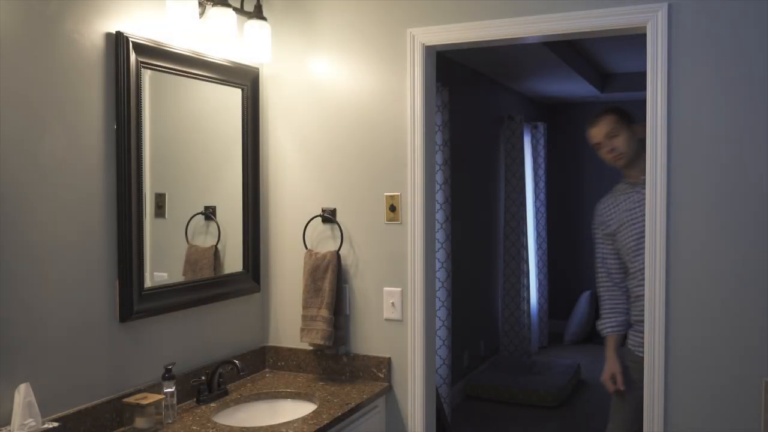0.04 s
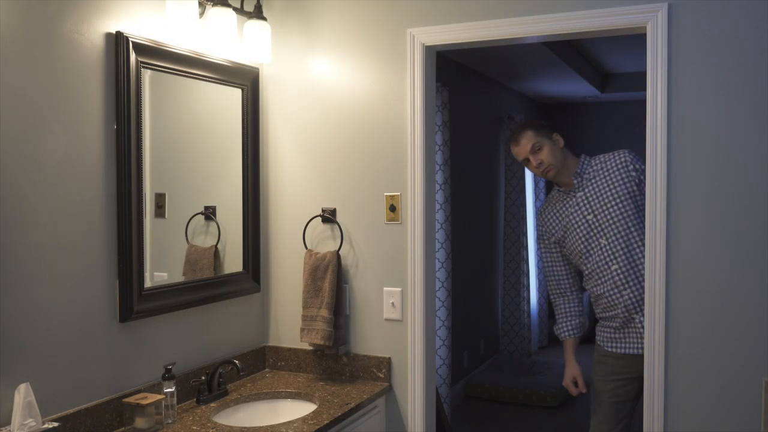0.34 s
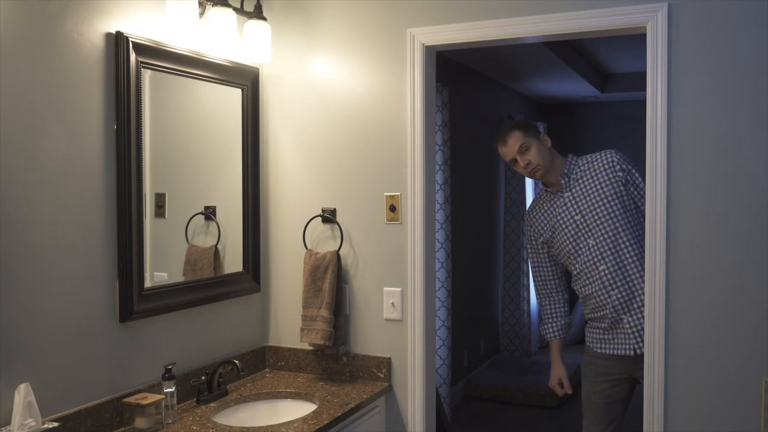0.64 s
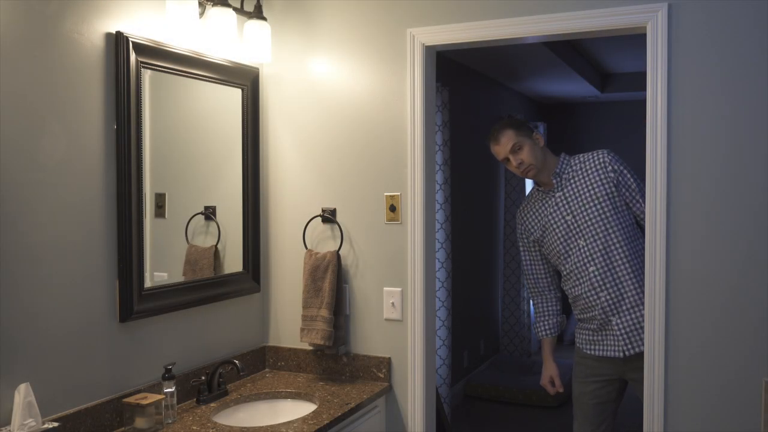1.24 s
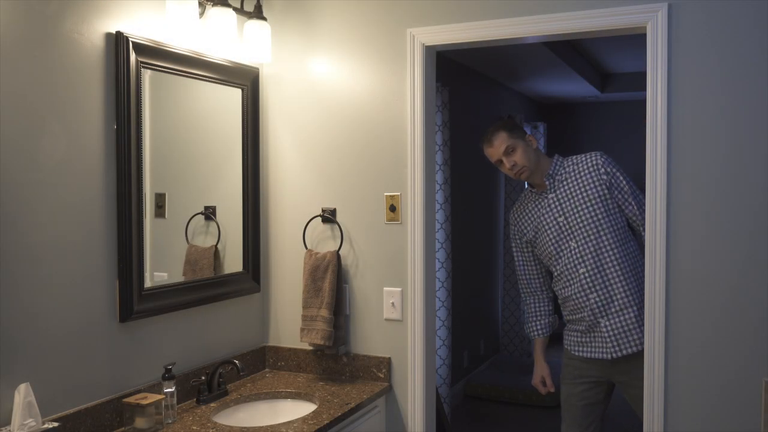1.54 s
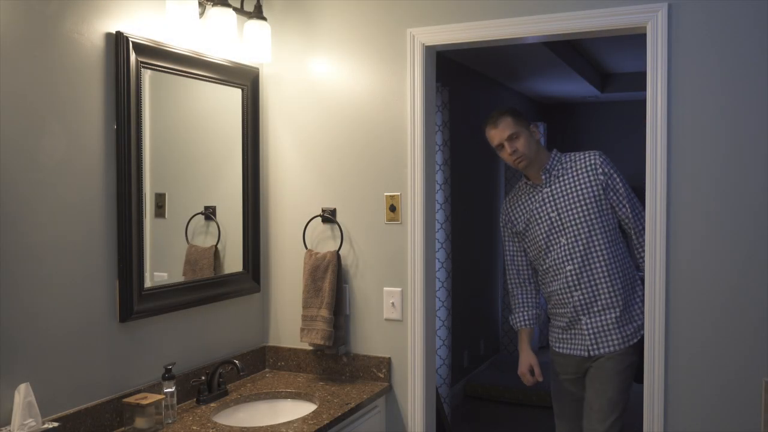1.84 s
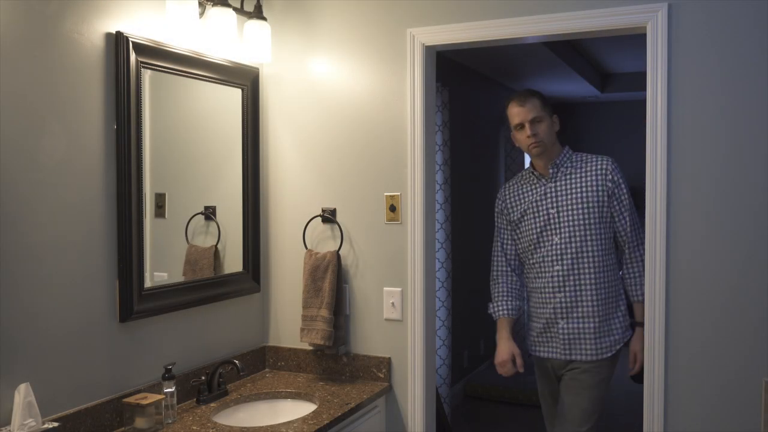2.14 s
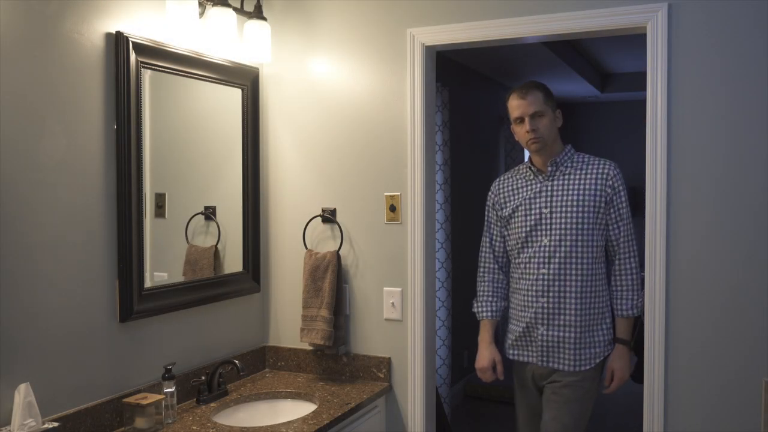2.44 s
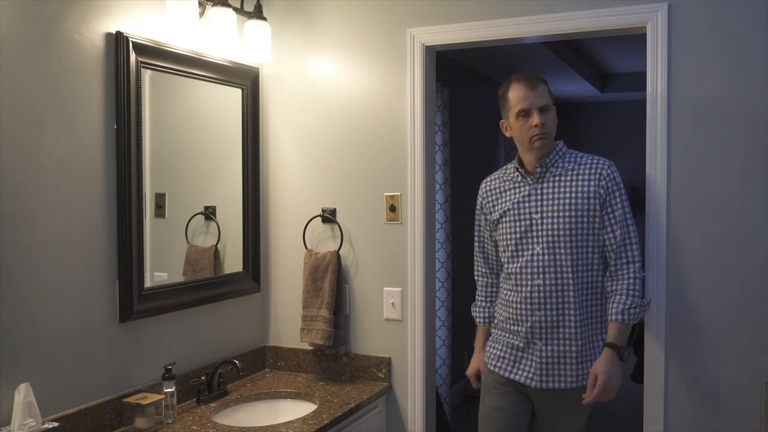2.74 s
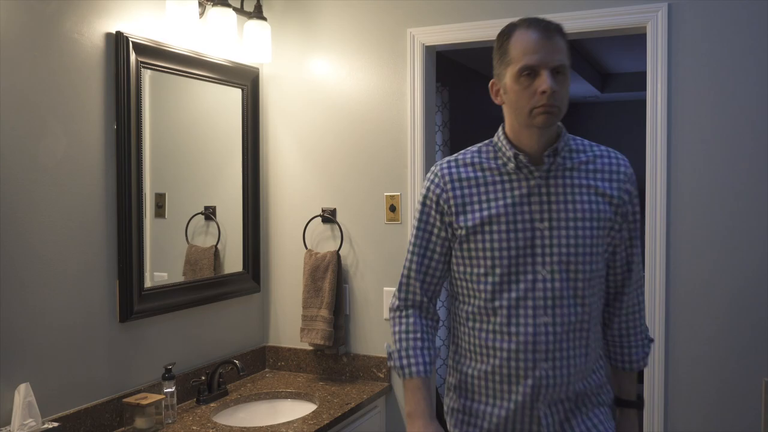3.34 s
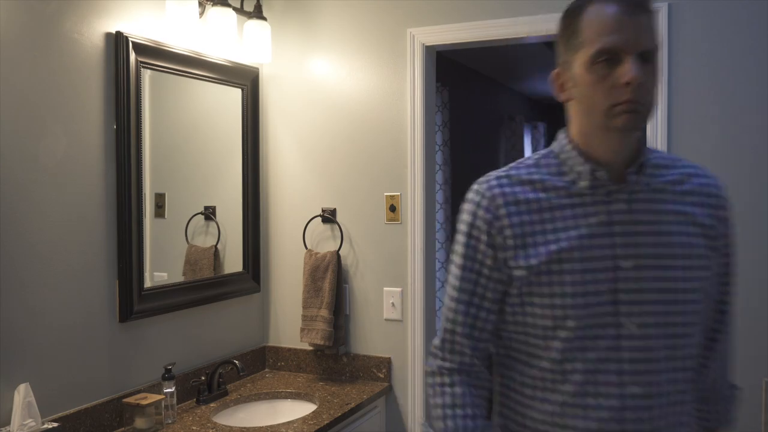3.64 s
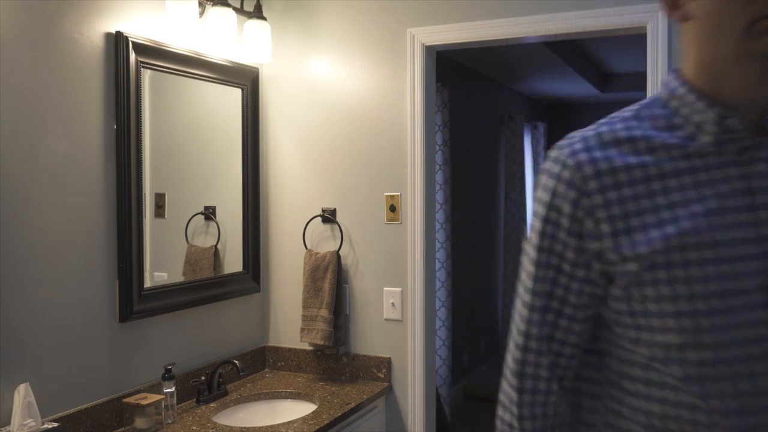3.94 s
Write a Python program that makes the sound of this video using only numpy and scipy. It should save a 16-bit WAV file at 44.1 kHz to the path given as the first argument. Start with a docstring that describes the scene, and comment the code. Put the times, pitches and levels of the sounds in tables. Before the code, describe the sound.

Water hisses steadily through a leaking toilet valve as a few footsteps approach.

```python
"""A bathroom, the microphone close to a leaking toilet valve. Water hisses through it: the jet
sputters and spits, valve and pipe ring in narrow bands, and small bubbles gurgle in the tank.
About halfway through, someone walks in: clothes rustle, soles scuff, and footsteps boom in the
floor and the room. The near water is dry; the walker carries the echo of the hard walls."""
import sys
import numpy as np
from scipy import signal
from scipy.fft import rfft, irfft
from scipy.io import wavfile

SR = 44100
rng = np.random.default_rng(int(sys.argv[2]) if len(sys.argv) > 2 else 0)


def master_out(mix):
    """Clip the mix to full scale and print it as 16-bit PCM to the path in sys.argv[1]."""
    frames = np.transpose(np.atleast_2d(mix))
    ceiling = np.clip(frames, -1, 1)
    pcm = np.round(ceiling * 32767).astype(np.int16)
    wavfile.write(sys.argv[1], SR, pcm)


N = 176400
T, HZ = np.arange(N) / SR, np.fft.rfftfreq(N, 1 / SR)

# resonances of valve and pipe: f/Hz, width/Hz, level/dB, swing with the jet/dB, own swing/dB
VALVE_MODES = [(3380, 124, -62.5, -1.2, 3.5), (4435, 210, -52.5, 1.0, 3), (5980, 320, -53.5, -0.5, 4),
               (6524, 300, -55.5, 0.5, 3.5), (9704, 230, -47.5, 2.6, 3), (10200, 650, -50, -1, 2.5),
               (11410, 430, -43.5, 3.2, 2.16), (12120, 360, -47, 2.5, 1.5), (12530, 430, -46.5, 3, 1.8),
               (13550, 450, -52, 9, -1), (14650, 560, -49.5, -1, 2), (15680, 300, -55, 7, -1)]
# stereo width of the water: f/Hz, side over mid/dB
WATER_WIDTH = [(130, -26), (1300, -25), (3400, -58), (4450, -7), (6000, -34), (8000, -57), (10500, -41),
               (11500, -18.5), (12600, -21), (13600, 0.5), (14500, -8), (15700, -16)]
# footfalls: t/s, level/dB, rise/s, hold/s, decay/s, dull above/Hz, ring of the floor/dB
FOOTFALLS = [(2.18, -46.5, .03, 0.065, 0.055, 55, -14), (2.609, -46.5, 0.016, .02, 0.16, 900, -12),
             (3.071, -30, 0.016, 0.021, 0.049, 850, 0), (3.245, -40.5, 0.0089, .01, 0.037, 600, -8.5),
             (3.674, -38.5, 0.018, .07, 0.11, 148, -7)]


def amp(db):
    """Decibels to gain."""
    return 10 ** (np.asarray(db) / 20)


def unit(x):
    """Scales to rms 1."""
    return x / np.sqrt(np.mean(x ** 2) + 1e-20)


def curve(points, hz=HZ):
    """Interpolates a table on a log-frequency axis."""
    f, value = np.transpose(points)
    return np.interp(np.log(hz + 1), np.log(f + 1), value)


def noise(gain):
    """Noise of rms 1 with the given spectrum."""
    return unit(irfft(rfft(rng.standard_normal(N)) * gain, N))


def stereo_noise(gain, side_db):
    """Left and right noise of rms 1, from a mid and a side signal."""
    mid, side = rfft(rng.standard_normal((2, N))) * gain
    side = side * amp(side_db)
    return unit(irfft(np.array([mid + side, mid - side]), N))


def band(hz, width_hz):
    """Spectrum of a resonance with broad, slowly falling skirts."""
    return 1 / (1 + ((HZ - hz) / (0.61 * width_hz)) ** 2)


def flutter(top_hz):
    """Random motion of rms 1 up to about top_hz, with no slow drift."""
    return noise(HZ / (HZ + 2) / (1 + (HZ / top_hz) ** 2))


def stroke(start, rise, decay, hold=0):
    """An envelope that rises, holds, then dies away."""
    t = np.maximum(T - start, 0)
    return np.sqrt(np.minimum(t / rise, 1)) * np.exp(-np.clip((t - rise - hold) / decay, 0, 50))


def swell(centre, half_length):
    """A bell-shaped rise and fall around a moment."""
    return np.exp(-np.minimum(((T - centre) / half_length) ** 2, 50))


def muffle(hz, dull_hz):
    """Low-pass gain: a soft sole takes the treble out of a footfall."""
    return 1 / np.hypot(1, (hz / dull_hz) ** 1.56)


def jet():
    """Close up, the sputtering jet drives a broad spray and the resonances of the valve."""
    # spectrum of the spray: f/Hz, level/dB
    spray = [(700, -32), (2900, -21.5), (3600, -15), (5400, -15), (6200, -9), (7200, -8.5), (9200, -6.5),
             (10800, -21.5), (12500, -5.5), (14200, -4.5), (15800, -5.5)]
    # drift of the top of the hiss: t/s, level near 10 kHz/dB, level near 12 kHz/dB
    treble_drift = [(0, -1, -6), (.14, 5, 0), (.35, 1, -3), (.6, 0, 1.5), (1.1, 0, 2), (1.4, -1, 2),
                    (1.9, .5, 0), (2.2, 1, 1), (2.37, -1, -3.5), (2.55, -1, 0), (3.3, 0, 0.5), (4, 0, 1.5)]
    times, near_10k_db, near_12k_db = np.transpose(treble_drift)
    sputter = noise(band(hz=25.2, width_hz=9.9))
    flow = unit(0.29 * sputter + 0.71 * flutter(top_hz=110))
    flow = unit(np.tanh(flow / 1.7))  # rounds off the extremes
    side_db = curve(WATER_WIDTH)
    out = amp(-40.5) * unit(stereo_noise(amp(curve(spray)), side_db) * amp(2.5 * flow))
    for hz, width, db, with_jet_db, own_db in VALVE_MODES:
        drift_db = near_10k_db * (9000 < hz < 11000) + near_12k_db * (11000 < hz < 13000)
        ring = stereo_noise(band(hz, width), side_db)
        flicker = amp(with_jet_db * flow + own_db * flutter(top_hz=45.2))
        out += amp(db + np.interp(T, times, drift_db)) * unit(ring * flicker)
    return out


def spits():
    """Air pockets burst in the valve: a fine crackle and some longer spits."""
    # two spectra of a spit: f/Hz, level of the usual one/dB, level of the lower one/dB
    colours = [(2500, -37, -36), (4400, -16, -24), (6200, -13.5, -21), (9100, -10.5, -12), (9700, -9, 6),
               (10700, -7.5, -3), (11430, 4.5, -1), (12550, 2, 0), (13300, -7, -1), (15700, -5, -0.5)]
    # strongest spits: t/s, level/dB, half-length/s, power share of the lower spectrum (0-1)
    bursts = [(0.145, -25.5, 0.0053, 0.9), (0.442, -30, .003, .1), (0.569, -31, .005, .2),
              (.616, -26, .0025, .1), (0.621, -28, .003, .1), (0.914, -31, .007, .5),
              (1.085, -28, .003, .3), (1.273, -25.5, 0.0015, .1), (1.552, -30.5, 0.0076, 0.1),
              (1.646, -30, 0.0054, .1), (1.682, -29, 0.0045, .1), (1.785, -30.5, .005, .2),
              (1.933, -28, .005, .1), (1.969, -27, 0.0031, .2), (2.180, -26, 0.0021, .1),
              (2.488, -31, 0.0059, .1), (2.59, -27, 0.0036, .3), (2.694, -28.5, 0.0041, .1),
              (2.831, -30.5, .005, .1), (3.044, -25.5, 0.0029, .1), (3.196, -28.5, 0.0054, .3),
              (3.3, -34, 0.0024, .3), (3.823, -28.5, .005, .2), (3.9, -22.5, .0045, 0.9)]
    spectra = [amp(curve(np.array(colours)[:, [0, k]])) for k in (1, 2)]
    usual, lower = (stereo_noise(gain, curve(WATER_WIDTH)) for gain in spectra)
    pops_per_s, pop_decay_s = 290, 0.0013
    pops = rng.random(N) < pops_per_s / SR
    strength = amp(5 * np.minimum(rng.exponential(1, N), 2))  # spread over 10 dB
    crackle = unit(signal.lfilter([1], [1, -np.exp(-1 / (pop_decay_s * SR))], pops * strength))
    out = amp(-45) * crackle * usual
    grain = unit(amp(0.99 * flutter(top_hz=500)))
    for t, db, half_length, share in bursts:
        hiss = np.sqrt(1 - share) * usual + np.sqrt(share) * lower
        out += amp(db) * grain * swell(t, half_length) * hiss
    return out


def tank():
    """Bubbles ring briefly in the tank over a steady gurgle and the drone of the supply pipe."""
    # spectrum of the gurgle: f/Hz, level/dB
    gurgle = [(500, -26), (900, -16), (1100, -10), (1200, -2.5), (1280, 2), (1360, -5.5), (1480, -18.5),
              (1800, -30)]
    # single bubbles: t/s, peak level/dB
    bubbles = [(0.6141, -36.5), (0.6618, -26), (0.7174, -33.5), (0.8692, -38), (0.9608, -37), (2.7302, -33),
               (3.199, -29.5), (3.597, -32)]
    # spectrum of the pipe's drone: f/Hz, level/dB
    drone = [(50, -19), (92, -12), (108, -1.5), (135, -1), (158, -5.5), (180, -20), (245, -13), (290, -25),
             (500, -35)]
    bubble_hz = 1223
    out = amp(-51) * unit(noise(amp(curve(gurgle))) * amp(2 * flutter(top_hz=69)))
    for t, db in bubbles:
        out += amp(db) * stroke(t, rise=0.0011, decay=0.0035) * np.sin(2 * np.pi * bubble_hz * (T - t))
    return out + amp(-52) * noise(amp(curve(drone)))


def room_tone():
    """The still air of the room: a faint, wide rumble."""
    # spectrum of the air: f/Hz, level/dB
    air = [(8, 1.5), (22, 4), (40, -7), (80, -11), (200, -19), (500, -26.5), (1000, -26.5), (1700, -32),
           (2300, -17.5), (2800, -40), (6000, -58.5)]
    return amp(-50) * stereo_noise(amp(curve(air)), side_db=-0.5)


def rubbing():
    """Clothes rustle more as the walker nears the microphone; soles and sleeves scuff."""
    # course of the rustle: t/s, level/dB
    rustle = [(0, -56.5), (.6, -60), (1.6, -71.5), (2.1, -60.5), (2.22, -52.5), (2.45, -65), (2.7, -49),
              (3.0, -50), (3.25, -46.5), (3.45, -51), (3.75, -46), (4, -50.5)]
    # spectrum of rubbing cloth: f/Hz, level/dB
    cloth = [(80, -19), (300, 1), (700, -3.5), (1500, -4.5), (2300, -7), (4000, -6.5), (8000, -7),
             (14000, -42)]
    # scuffs of soles and cloth: t/s, level/dB, rise/s, decay/s, centre f/Hz, half-width/octaves
    scuffs = [(2.61, -46.5, 0.01, 0.09, 387, 0.62), (2.776, -42.5, 0.016, 0.052, 2600, 1),
              (3.073, -44.5, 0.0045, .06, 1900, 0.74), (3.82, -40, 0.02, 0.11, 373, 0.65)]
    out = amp(np.interp(T, *np.transpose(rustle))) * stereo_noise(amp(curve(cloth)), side_db=-5.5)
    for t, db, rise, decay, hz, octaves in scuffs:
        colour = 1 / (1 + (np.log2((HZ + 1) / hz) / octaves) ** 4)
        out += amp(db) * stroke(t, rise, decay) * stereo_noise(colour, side_db=-16)
    return out


def surges():
    """Brief surges of flow make the two lowest resonances of the valve whistle."""
    # whistles: t/s, half-length/s, level of the lower resonance/dB, level of the upper/dB
    whistles = [(0.255, 0.0081, -60, -46), (0.393, 0.019, -49.5, -49), (0.994, 0.017, -52.5, -47),
                (1.22, 0.01, -47.5, -43), (1.69, 0.043, -58, -46.5), (1.79, 0.017, -52, -45.5),
                (2.001, .011, -44, -58), (2.845, .016, -48, -48), (3.015, .014, -54, -44),
                (3.6, 0.017, -60, -46)]
    out = np.zeros((2, N))
    for k, (hz, width, *_) in enumerate(VALVE_MODES[:2]):
        envelope = sum(amp(dbs[k]) * swell(t, half_length) for t, half_length, *dbs in whistles)
        out += envelope * stereo_noise(band(hz, width), curve(WATER_WIDTH))
    return out


def footsteps():
    """Each footfall thuds while the weight comes down, dulled by the sole."""
    # spectrum of a footfall: f/Hz, level/dB
    tread = [(20, -3.5), (55, -9.5), (90, -3), (150, -3), (230, -5.5), (340, -2.5), (480, -10.5), (750, -8),
             (1100, -14.5), (1800, -33), (3000, -25), (6000, -6)]
    out = np.zeros((2, N))
    for t, db, rise, hold, decay, dull_hz, _ in FOOTFALLS:
        thud = stereo_noise(amp(curve(tread)) * muffle(HZ, dull_hz), side_db=-20.5)
        out += amp(db) * stroke(t, rise, decay, hold) * thud
    return out


def floor_boom():
    """The modes of floor and room build up under each footfall and ring on."""
    # modes of floor and room: f/Hz, relative level/dB, t60/s
    modes = [(150.4, 2.5, 0.27), (178, -4, .25), (278, -16.5, 0.22), (344, -6.5, 0.27), (416.3, -15, 0.68),
             (549, -20, 0.41), (669, -18, .5), (710, -17, 0.28), (752, -21, 0.63)]
    out = np.zeros(N)
    for t, db, *_, dull_hz, ring_db in FOOTFALLS:
        for hz, mode_db, t60 in modes:
            envelope = stroke(t, rise=0.032, decay=t60 / np.log(1000), hold=0.046)
            tone = np.sin(2 * np.pi * (hz * T + rng.random()))
            out += amp(db + ring_db + mode_db - 0.5) * muffle(hz, dull_hz) * envelope * tone
    return out


def wall_echoes(x):
    """Dense echoes off hard walls, each band dying at its own speed; the bass leaks away."""
    # reverberation time of the bathroom: f/Hz, t60/s
    reverb_time = [(100, 0.57), (400, 0.7), (1500, 1), (6000, 0.44)]
    low_cut_hz = 222
    echoes = stereo_noise(HZ ** 2 / (HZ ** 2 + low_cut_hz ** 2), side_db=-16)[:, :SR]
    hz, t, bands = signal.stft(echoes, SR, nperseg=256)
    decay = amp(-60 * t / curve(reverb_time, hz)[:, None])
    _, tail = signal.istft(bands * decay, SR, nperseg=256)
    return signal.fftconvolve(x, tail / np.linalg.norm(tail[0]), axes=1)[:, :N]


def scene():
    """Water close to the microphone, the walker out in the room, and room tone behind both."""
    # stereo balance of the water: f/Hz, left minus right/dB
    balance = [(1300, -.5), (2300, 12), (3200, -1.5), (4500, 1), (6000, -0.5), (10500, 0.1), (11500, -1.2),
               (12700, -1.2), (14000, 1.7), (15700, 3)]
    pan = amp(np.outer([0.5, -0.5], curve(balance)))
    water = irfft(rfft(jet() + surges() + spits() + tank()) * pan, N)
    walker = footsteps() + rubbing()
    return water + walker + room_tone() + floor_boom() + amp(-3.5) * wall_echoes(walker)


def record(dry):
    """The recorder's band limit cuts off the highest treble."""
    edge_hz = 15740
    low_pass = signal.firwin(701, edge_hz, window=("kaiser", 8), fs=SR)
    return signal.oaconvolve(dry, low_pass[None], "same")


dry = scene()
out = record(dry)
master_out(out)
```